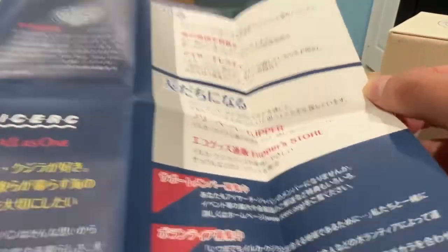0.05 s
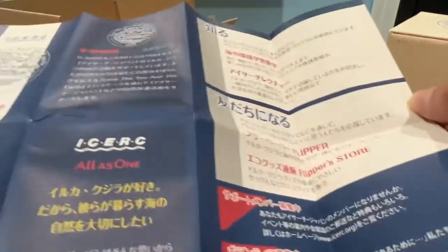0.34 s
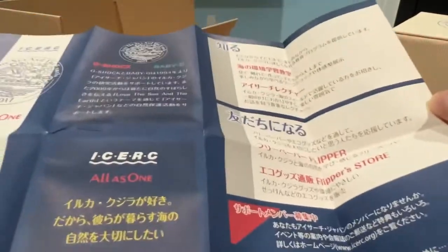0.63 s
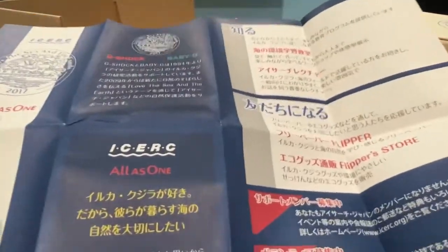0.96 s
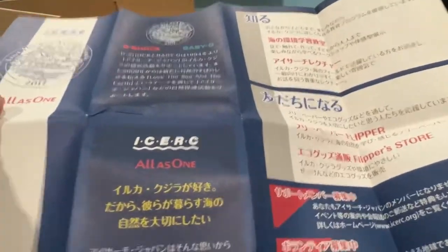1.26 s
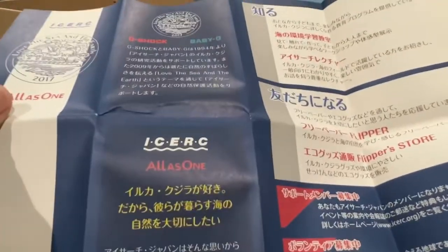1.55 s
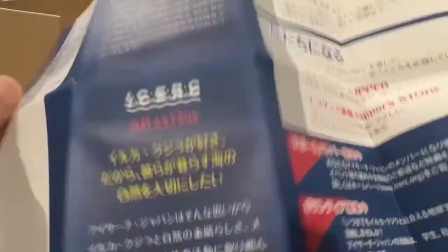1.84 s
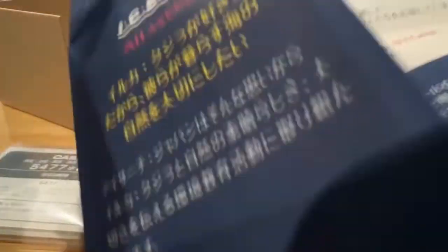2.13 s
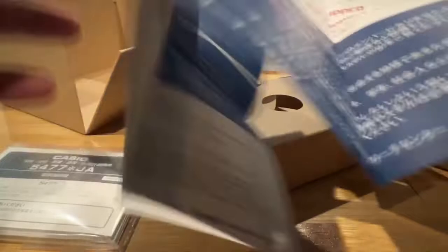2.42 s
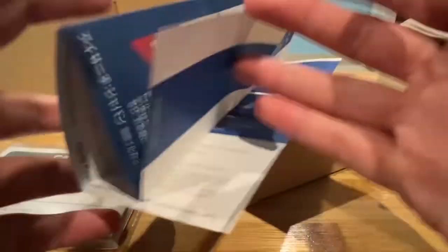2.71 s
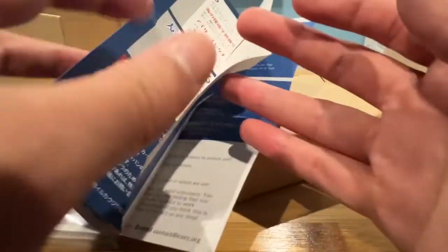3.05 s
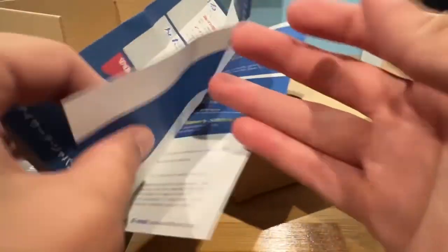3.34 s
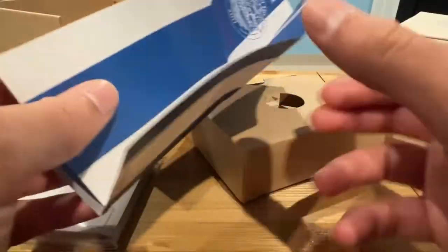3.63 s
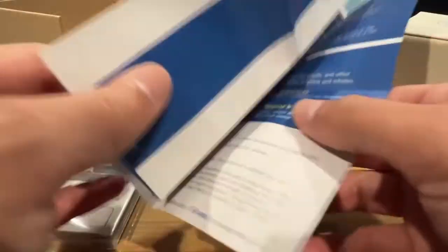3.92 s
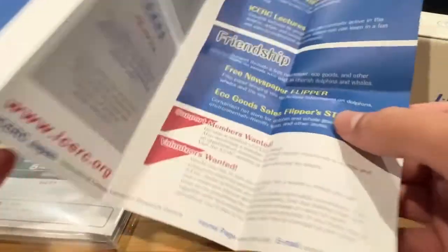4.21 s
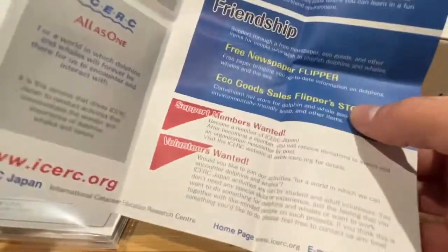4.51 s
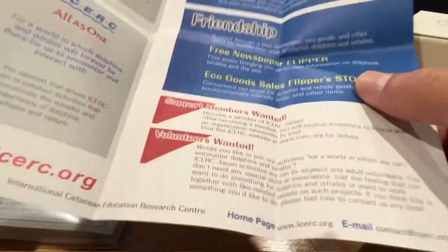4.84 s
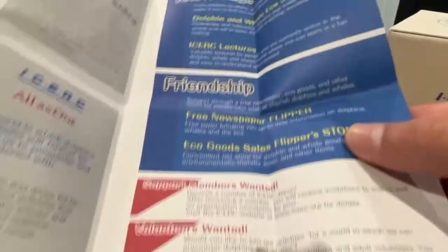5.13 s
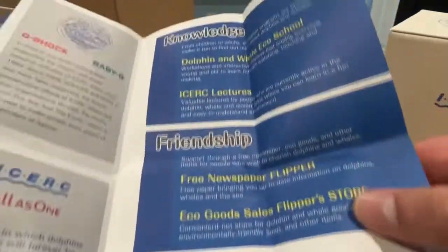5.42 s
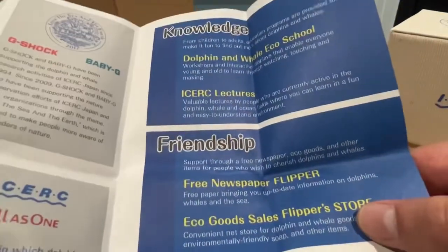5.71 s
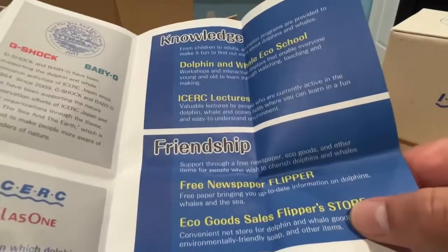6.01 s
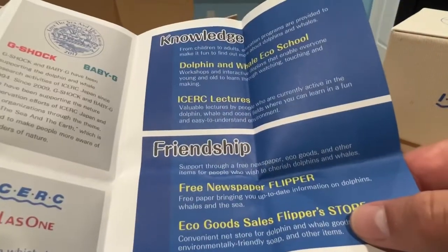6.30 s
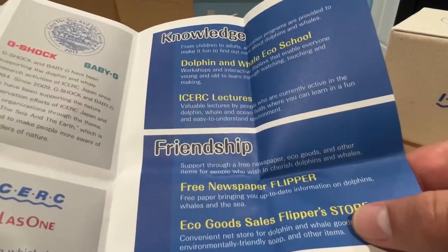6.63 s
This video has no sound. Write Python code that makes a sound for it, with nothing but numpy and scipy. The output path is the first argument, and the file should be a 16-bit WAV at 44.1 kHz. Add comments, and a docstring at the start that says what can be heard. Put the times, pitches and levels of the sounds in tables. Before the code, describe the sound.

In a small room with a steady low hum, hands spread a stiff paper leaflet near the microphone, slightly to the left. Paper brushes over paper and fingers, creases tick, and panels buckle with sharp cracks and soft flaps. The crinkling is busiest through the middle, as the sheet is flipped and reopened, then thins out to a late snap and faint touches.

```python
"""A folded leaflet of stiff glossy paper is spread, turned over and opened again in a small room,
close to a phone's two microphone ports. Paper slides on paper and fingers; panels buckle with snaps
whose bending waves chirp downwards and end in a soft flap; creases tick. Table and walls add a short
tail, and a low ventilation hum fills the room behind it all."""
import sys
import numpy as np
from scipy import signal
from scipy.fft import rfft, irfft
from scipy.io import wavfile
from scipy.ndimage import uniform_filter1d

SR = 44100
rng = np.random.default_rng(int(sys.argv[2]) if len(sys.argv) > 2 else 0)


def wav_out(sig):
    """Save sig, one row per channel (or a flat mono array), as 16-bit PCM at SR to the path in sys.argv[1]."""
    wavfile.write(sys.argv[1], SR, np.round(np.clip(np.atleast_2d(sig).T, -1, 1) * 32767).astype(np.int16))


N = 298116
TIME, FREQ = np.arange(N) / SR, np.maximum(np.fft.rfftfreq(N, 1 / SR), 1)
SNAP_SIZE = 8192  # samples in one snap or tick
SNAP_TIME, SNAP_FREQ = np.arange(SNAP_SIZE) / SR, np.maximum(np.fft.rfftfreq(SNAP_SIZE, 1 / SR), 1)


def undb(db):
    """Decibels to gain."""
    return 10 ** (np.asarray(db) / 20)


def unit(x):
    """Scale to rms 1."""
    return x / np.sqrt(np.mean(x ** 2))


def pan(db):
    """Left and right gains for a level difference."""
    return undb(np.array([[db], [-db]]) / 2)


def decay(t, t60_s):
    """Envelope that falls 60 dB in t60_s."""
    return np.exp(-np.log(1000) * t / t60_s)


def resonance(freq, hz, q):
    """Complex response of one resonance at hz."""
    return 1 / (1 + 1j * q * (freq / hz - hz / freq))


def colour(points, freq):
    """Gain of (frequency [Hz], level [dB]) points joined on a log-frequency axis."""
    hz, db = np.transpose(points)
    return undb(np.interp(np.log(freq), np.log(hz), db))


def causal(gain):
    """The quickest causal response with this gain, from its cepstrum."""
    cepstrum = irfft(np.log(gain + 1e-9))
    half = len(cepstrum) // 2
    cepstrum[1:half] *= 2
    cepstrum[half + 1:] = 0
    return np.exp(rfft(cepstrum))


def burst_spectrum(burst):
    """Spectrum of a burst scaled to unit energy."""
    return rfft(burst) / np.sqrt(np.sum(burst ** 2))


def broadband(spectrum):
    """Even a spectrum out to unit power per half octave or so; its fine peaks and its attack stay."""
    total = np.cumsum(np.abs(spectrum) ** 2)
    bins = np.arange(len(total))
    lo = np.maximum(bins * 5 // 6 - 8, 0)
    hi = np.minimum(bins * 6 // 5 + 8, bins[-1])
    return spectrum * causal(np.sqrt((hi - lo) / (total[hi] - total[lo] + 1e-9)))


def ports(a, b, freq, apart_hz):
    """Two spectra to the left and right ports: alike in the bass, unrelated well above apart_hz."""
    side = np.sqrt((freq ** 2 + 120 ** 2) / (freq ** 2 + apart_hz ** 2))
    return np.array([a + side * b, a - side * b]) / np.sqrt(1 + side ** 2)


def walk(rate):
    """Random levels held 1 / rate s and smoothed twice; rms 1."""
    hold = max(int(SR / rate), 2)
    held = np.repeat(rng.standard_normal(N // hold + 1), hold)
    return unit(uniform_filter1d(uniform_filter1d(held, hold), hold)[:N])


def add(out, s, sound):
    """Mix a stereo sound in at time s."""
    start = max(int(s * SR), 0)
    out[:, start:start + sound.shape[1]] += sound[:, :N - start]


# the still room behind the leaflet: (frequency [Hz], level [dB])
RUMBLE_SPECTRUM = [(20, -37.5), (38, -12), (50, -1), (64, -1), (85, -9), (115, -5), (150, -15.5),
                   (190, -16.5), (270, -22), (400, -38), (700, -52.5), (2000, -52.5), (6000, -63),
                   (16000, -68.5)]
# the ventilation's tones: (frequency [Hz], level [dB])
HUM_TONES = [(64.4, -54), (144, -58)]
def ventilation(rumble_db, hum_db, waver_rad):
    """All round the microphone, a steady low rumble with two wavering hum tones, over faint hiss."""
    noise = ports(*rfft(rng.standard_normal((2, N))), FREQ, apart_hz=710)
    rumble = unit(irfft(noise * colour(RUMBLE_SPECTRUM, FREQ), N))
    hum = 0
    for hz, db in HUM_TONES:
        amplitude = np.sqrt(2) * undb(db + 2 * walk(rate=5))
        hum = hum + amplitude * np.sin(2 * np.pi * hz * TIME + waver_rad * walk(rate=4.8))
    return undb(rumble_db) * rumble + undb(hum_db) * hum


def hand_speed(start_s, rise_s, fall_s):
    """One movement of the hand: it speeds up from rest and slows to rest again; 0-1."""
    ramp = np.interp(TIME, [start_s, start_s + rise_s, start_s + rise_s + fall_s], [0, 1, 0])
    return np.sin(np.pi / 2 * ramp)


def friction(spectrum, catch_rate, catch_share, apart_hz):
    """Fibres catch and let go: countless small slips and a few larger catches ring the sheet."""
    catches = (rng.random(N) < catch_rate / SR) * rng.laplace(size=(2, N))
    a, b = rfft(rng.standard_normal((2, N)) + catch_share * unit(catches))
    slips = ports(a, b, FREQ, apart_hz) * colour(spectrum, FREQ)
    out = irfft(slips, N)
    for _ in range(2):  # as the contact wanders, different sets of modes come and go
        modes = burst_spectrum(rng.standard_normal(N) * decay(np.minimum(TIME, 0.15), t60_s=0.015))
        out = out + 0.61 * walk(rate=22) * irfft(slips * modes, N)
    return unit(out)


def crinkles(rate, strength, decay_s):
    """Gain on the rubbing noise: now and then a fold snags and lets go with a brief crackle."""
    snags = (rng.random(N) < rate / SR) * rng.exponential(size=N)
    releases = signal.lfilter([1], [1, -np.exp(-1 / (decay_s * SR))], snags)
    return unit(1 + strength * releases)


# sliding paper heard close up, as panel body, hiss and fine sheen: (frequency [Hz], level [dB])
BODY_SPECTRUM = [(60, -16.5), (150, 4.5), (300, -2), (600, 0), (1200, -5.5), (1900, -10), (3000, -26.5),
                 (8000, -59.5)]
HISS_SPECTRUM = [(600, -32), (1400, -12), (2200, -1.5), (3500, -2.5), (6000, -0.5), (8500, -9),
                 (16000, -37.5)]
SHEEN_SPECTRUM = [(3000, -38), (6000, -7.5), (8500, 3), (12000, 0), (16000, -5.5)]
# hand movements that drag the paper:
# (start [s], speeding up [s], slowing down [s], level [dB], body offset [dB], sheen offset [dB])
HAND_STROKES = [(0.0, 0.089, 0.13, -64, 3, -13), (0.151, 0.014, 0.29, -58, 6.5, -1),
                (0.419, 0.062, 0.16, -65, 10.5, -8.5), (0.606, 0.073, 0.23, -61, 5.5, -3.5),
                (1.0, 0.2, 0.55, -67, -7.5, -10.5), (1.2, 0.14, 0.084, -56, -2, -10),
                (1.804, 0.072, 0.087, -48, -1, 1.5), (1.86, 0.082, 0.11, -58, 11.5, -3),
                (2.03, 0.097, 0.26, -54, -5.5, -6), (2.25, 0.065, 0.45, -66, 2.5, -18),
                (2.481, 0.0099, 0.19, -54.5, 6.5, 4.5), (2.68, 0.011, 0.12, -45, 0, -7),
                (2.681, 0.13, .3, -43.5, -2, -3.5), (3.189, 0.078, 0.21, -66.5, -6, -4.5),
                (3.317, 0.046, 0.033, -40.5, -8.5, -6.5), (3.35, 0.11, 0.069, -52.5, -4, 0.5),
                (3.49, 0.074, 0.062, -63.5, -2.5, -3), (3.63, 0.079, 0.32, -62.5, -3.5, -5.5),
                (3.853, 0.0092, 0.054, -44.5, -12, 2.5), (3.87, 0.18, 0.025, -59, 3, 4.5),
                (4.089, 0.11, 0.069, -54, -9, -3.5), (4.249, 0.2, 0.023, -53.5, -11, -2),
                (4.45, 0.05, 0.06, -53.5, 2, 1), (4.529, 0.07, 0.052, -54, 4, -2),
                (4.694, 0.01, 0.011, -57, -2, 8.5), (4.695, 0.016, 0.15, -66.5, -1.5, -19),
                (4.98, 0.16, 0.34, -70, -3, -12.5), (5.26, 0.052, 0.035, -65.5, -0.5, -7.5),
                (5.599, 0.069, 0.18, -70, 10, -6.5), (5.98, 0.051, 0.066, -71.5, 6.5, -0.5)]
def sliding(body_db, hiss_db, sheen_db, judder_db, pan_db):
    """Close by, a little left, paper drags over paper and skin; the uneven grip shakes the sound."""
    power = undb([-89, -79, -103])[:, None] ** 2  # hiss, body, sheen of the sheet trembling in still hands
    for start_s, rise_s, fall_s, db, body_offset_db, sheen_offset_db in HAND_STROKES:
        drag = hand_speed(start_s, rise_s, fall_s) ** 1.25  # friction grows faster than speed
        gains = undb([db, db + body_offset_db, db + sheen_offset_db])
        power = power + np.outer(gains, drag) ** 2
    hiss_gain, body_gain, sheen_gain = np.sqrt(power) * undb([hiss_db, body_db, sheen_db])[:, None]
    grip = unit(undb(judder_db * (walk(rate=130) + walk(rate=50))))
    body = body_gain * friction(BODY_SPECTRUM, catch_rate=210, catch_share=0.57, apart_hz=810)
    hiss = hiss_gain * friction(HISS_SPECTRUM, catch_rate=410, catch_share=0.4, apart_hz=1180)
    sheen = sheen_gain * friction(SHEEN_SPECTRUM, catch_rate=980, catch_share=0.74, apart_hz=1200)
    crackle = crinkles(rate=60, strength=0.45, decay_s=0.002)
    return (body * pan(pan_db) + (hiss * pan(pan_db) + sheen) * crackle) * grip


def stutter(length_s, grit):
    """A crease gives way in a quick run of tiny, unequal slips that builds up and dies out."""
    slips = rng.standard_normal(SNAP_SIZE) * np.exp(grit * rng.standard_normal(SNAP_SIZE))
    age = SNAP_TIME / length_s
    return burst_spectrum(slips * np.sqrt(age) * np.exp(-age ** 2))


def sheet_ring(low_t60_s, high_t60_s, split_hz):
    """The dense, heavily damped modes of the sheet at both ports; the low ones last longer."""
    def modes(t60_s):
        return burst_spectrum(rng.standard_normal(SNAP_SIZE) * decay(SNAP_TIME, t60_s))
    low = 1 / (1 + (SNAP_FREQ / split_hz) ** 2)
    a, b = (np.sqrt(low) * modes(low_t60_s) + np.sqrt(1 - low) * modes(high_t60_s) for _ in range(2))
    return ports(a, b, SNAP_FREQ, apart_hz=614)


def bending_wave(lag_at_1k_s):
    """Bending waves speed up as the root of frequency, so the treble arrives first and the lows trail."""
    return np.exp(-4j * np.pi * lag_at_1k_s * np.sqrt(1000 * (SNAP_FREQ + 20)))


# panels buckling close to the microphone: (time [s], stutter length [s], crack level [dB],
# crack corner [Hz], flap pitch [Hz], flap level [dB], crack left minus right [dB])
BUCKLES = [(0.0416, 0.00059, 5.5, 890, 223, 11.5, 3.5), (0.158, 0.0015, 0.5, 446, 187, 12, 13),
           (1.296, 0.02, -2.5, 1470, 320, 2, 12), (1.344, 0.00083, -13, 587, 128, 16, 31),
           (1.36, 0.00037, 7.5, 1333, 119, 14.5, 4), (1.425, 0.00062, 1, 1130, 288, 1.5, 2.5),
           (1.4977, 0.00075, -5, 630, 211, -1.5, 6.5), (1.788, 0.0063, -2, 1320, 432, -8.5, 4),
           (2.005, 0.0076, 4, 780, 355, 5.5, -0.5), (2.1134, 0.002, 11, 820, 181, 20.5, 1.5),
           (2.118, 0.0021, 9, 650, 423, 11, 20), (2.304, 0.021, 0.5, 475, 410, -2.5, -6),
           (2.4805, 0.0031, 6.5, 1850, 147, 18, -2.5), (2.582, 0.0091, 7.5, 1510, 196, 16, 3),
           (2.597, 0.011, 10.5, 1190, 126, 20.5, 12), (2.613, 0.004, 13, 1270, 192, 17.5, -1),
           (2.662, 0.006, 4, 1800, 265, 8, 1), (2.681, 0.0063, 0, 850, 397, 1, 5),
           (2.7205, 0.0019, 3.5, 1220, 323, -8, 1), (2.726, 0.016, 8, 1350, 260.5, -9, 1.5),
           (2.827, 0.0035, -2, 398, 81.6, 21, 3), (3.351, 0.0057, 4, 3560, 209, 14, 0.5),
           (3.794, 0.0067, -8.5, 1110, 298, -17, 1), (4.0042, 0.003, 2.5, 2140, 132, 18, 5.5),
           (4.013, 0.0018, 17, 325, 140, 16, 1), (4.049, 0.028, 6, 860, 169, 7, 5.5),
           (4.065, 0.02, 9, 402, 159, 16.5, -2), (4.092, 0.014, 12, 890, 160, 20.5, 5),
           (4.1446, 0.0046, 3, 1220, 207, 11.5, 1), (4.2646, 0.0023, 3.5, 1450, 253, 10, 3),
           (4.278, 0.0053, -0.5, 1050, 260, 11, 9), (4.353, 0.0051, 4.5, 2000, 260, 13, 2),
           (4.357, 0.0058, 13, 512, 266, 13.5, 5.5), (4.586, 0.012, -6, 450, 340, 4, 10),
           (4.703, 0.0039, -5, 2060, 347, 6, 6.5), (5.4572, 0.00079, 15, 1130, 167, 21.5, 8),
           (5.483, 0.0063, 1, 935, 168, 19, 10), (5.741, 0.007, -4.5, 1700, 320, 2.5, 5.5)]
def snaps(crack_db, corner_peak_db, ring_db, flap_ring_db, flap_q, port_lag_s):
    """Each buckle sends a crack through the sheet and sets a whole panel flapping."""
    out, freq = np.zeros((2, N)), SNAP_FREQ
    bass_loss = freq / np.hypot(freq, 300)  # a small patch of paper radiates little bass
    for s, length_s, db, corner_hz, flap_hz, flap_db, pan_db in BUCKLES:
        fall_db_per_octave = 15.5 + 0.15 * db  # a stronger buckle is broader and so rounder
        rolloff_db = fall_db_per_octave * np.log2(1 + (freq / corner_hz) ** 4) / 4
        peak_db = corner_peak_db / (1 + (3 * np.log2(freq / corner_hz)) ** 2)
        tone = causal(undb(db + crack_db - rolloff_db + peak_db) * bass_loss)
        slips = ports(stutter(length_s, grit=0.7), stutter(length_s, grit=0.11), freq, apart_hz=3300)
        ring = sheet_ring(low_t60_s=0.1, high_t60_s=0.043, split_hz=1500)
        rattle = np.array([broadband(x) for x in slips * (1 + undb(ring_db) * ring)])
        crack = tone * rattle * bending_wave(lag_at_1k_s=0.001381)
        wobble = np.array([broadband(x) for x in 1 + undb(flap_ring_db) * ring])
        panel = undb(flap_db) * resonance(freq, flap_hz, flap_q) ** 2
        flap = panel * wobble * bending_wave(lag_at_1k_s=0.002186)
        snap = crack * pan(pan_db) + flap * pan(pan_db * 0.28)
        snap[1] *= np.exp(-2j * np.pi * freq * port_lag_s)  # the right port hears it later
        add(out, s, irfft(snap))
    return out


# fingertips on the gloss, faint even this close: (start [s], end [s], level [dB])
FINGER_RUBS = [(0.822, 1.32, -77.5), (2.296, 2.5, -72.5), (4.656, 5.075, -79), (5.006, 5.489, -69.5),
               (6.553, 6.69, -78.5)]
def fingertips(hz, q, skin_db):
    """A fingertip creeps over the coating: a soft hiss with one hollow resonance."""
    pressure = 0
    for start_s, end_s, db in FINGER_RUBS:
        progress = np.clip((TIME - start_s) / (end_s - start_s), 0, 1)
        pressure = pressure + undb(db) * np.sqrt(np.abs(np.sin(np.pi * progress)))
    tone = resonance(FREQ, hz, q) + undb(skin_db) * colour(HISS_SPECTRUM, FREQ)
    return pressure * unit(irfft(rfft(rng.standard_normal((2, N))) * tone, N))


# creases and edges ticking near the microphone: (time [s], level [dB], centre [Hz])
CREASE_TICKS = [(0.836, -55, 4460), (1.033, -51.5, 3000), (1.289, -35, 3500), (1.31, -46, 5500),
                (1.3277, -28, 4500), (1.328, -27.5, 3500), (1.345, -36, 8000), (1.363, -27.5, 5500),
                (1.368, -43, 8000), (1.427, -50, 4000), (1.929, -24.5, 6500), (1.9553, -27.5, 5740),
                (1.989, -32, 4990), (2.1126, -25.5, 3070), (2.4827, -13.5, 11200), (2.687, -31, 10000),
                (2.731, -35, 7000), (2.8206, -29, 3480), (2.616, -26.5, 6860), (2.883, -29.5, 4550),
                (2.9327, -41, 4840), (3.336, -32.5, 3500), (3.462, -28.5, 11200), (3.6985, -44, 4150),
                (4.279, -28, 9000), (5.0967, -48.5, 3260), (5.4592, -27, 9100), (6.0671, -54.5, 8330)]
def ticks(gain_db, t60_s, q, rise_s, port_lag_s):
    """Tiny bright releases in a crease, too small to move a panel."""
    out = np.zeros((2, N))
    envelope = (1 - np.exp(-SNAP_TIME / rise_s)) * decay(SNAP_TIME, t60_s)
    arrival = np.exp(-2j * np.pi * np.outer([0, port_lag_s], SNAP_FREQ))
    for s, db, hz in CREASE_TICKS:
        burst = rfft(rng.standard_normal(SNAP_SIZE) * envelope)
        tick = irfft(burst * arrival * resonance(SNAP_FREQ, hz, q))
        add(out, s, tick / np.abs(tick).max() * undb(db + gain_db))
    return out


# the small room's decay: (frequency [Hz], time to fall 60 dB [s])
ROOM_DECAY = [(100, 0.68), (500, 0.28), (2000, 0.32), (6000, 0.52), (16000, .2)]
def room(x, wet_db, treble_db, first_echo_s):
    """The table and the near walls answer with a short diffuse tail."""
    t = np.arange(SR // 2) / SR
    freq = np.maximum(np.fft.rfftfreq(len(t), 1 / SR), 1)
    noise = ports(*rfft(rng.standard_normal((2, len(t)))), freq, apart_hz=612)
    hz, decay_times = np.transpose(ROOM_DECAY)
    tail = 0
    for band, t60_s in zip(np.eye(len(hz)), decay_times):
        share = np.interp(np.log(freq), np.log(hz), band)
        energy = t60_s * SR / np.log(1e6)
        tail = tail + irfft(noise * share) * decay(t, t60_s) / np.sqrt(energy)
    onset = np.clip(t / first_echo_s - 1, 0, 1)
    tail = irfft(rfft(tail * onset) * colour([(500, 0.0016), (8000, treble_db)], freq))
    return undb(wet_db) * signal.fftconvolve(x, tail, axes=1)[:, :N]


# broad peaks and dips that colour all the paper sounds: (frequency [Hz], gain [dB])
PAPER_COLOUR = [(480, 1), (670, -3.5), (900, 0.5), (1600, 1.5), (2500, 4), (3800, 3.5), (7000, -1.5)]
def scene():
    """The leaflet up close, with its echo and the hum of the room behind it."""
    paper = snaps(crack_db=2.0, corner_peak_db=2.5, ring_db=-3.5, flap_ring_db=-3, flap_q=1.06,
                  port_lag_s=0.00016)
    paper += ticks(gain_db=0.5, t60_s=0.014, q=1 / 1.5, rise_s=0.0002, port_lag_s=0.00017)
    paper += fingertips(hz=1870, q=4.8, skin_db=-19.0)
    paper += sliding(body_db=3.5, hiss_db=-2.5, sheen_db=3.5, judder_db=1.8, pan_db=5)
    paper = irfft(rfft(paper) * causal(colour(PAPER_COLOUR, FREQ)), N)
    echo = room(paper, wet_db=-7.5, treble_db=-8.0, first_echo_s=0.0061)
    return paper + echo + ventilation(rumble_db=-47.5, hum_db=1.0, waver_rad=1.31)


# notches of the phone's microphone ports: (frequency [Hz], width [Hz], gain [dB])
PORT_NOTCHES = [(10160, 530, -22.5), (13400, 570, -19.5)]
def record(dry):
    """The microphone ports notch the high treble; the top is cut steeply."""
    notches_db = sum(db * np.exp(-((FREQ - hz) / width) ** 2) for hz, width, db in PORT_NOTCHES)
    notched = irfft(rfft(dry) * causal(undb(notches_db)), N)
    top_cut = signal.ellip(10, 0.2, 80, 16050, fs=SR, output="sos")
    return signal.sosfilt(top_cut, notched)


dry = scene()
out = record(dry)
wav_out(out)
```